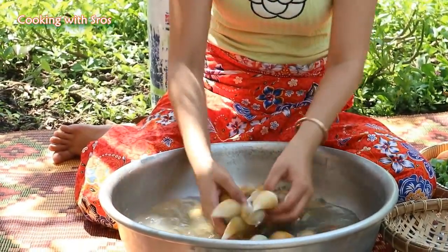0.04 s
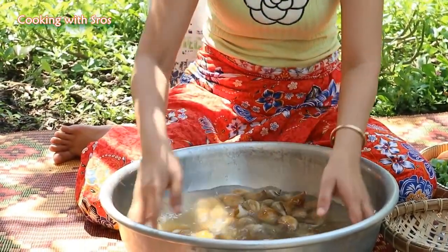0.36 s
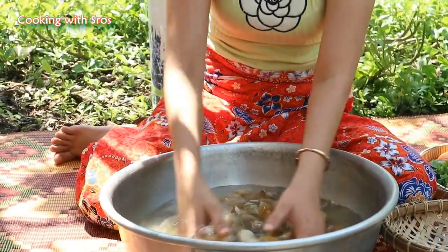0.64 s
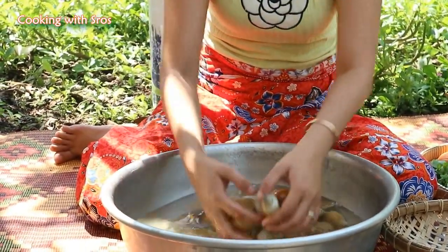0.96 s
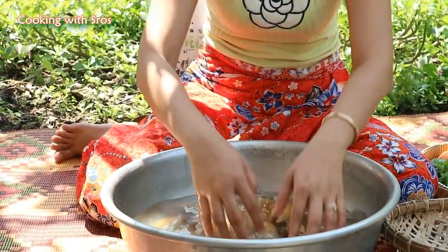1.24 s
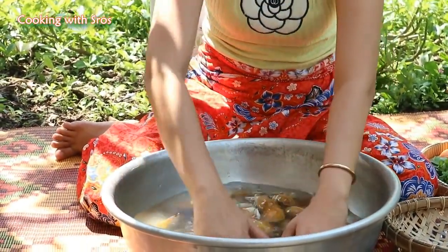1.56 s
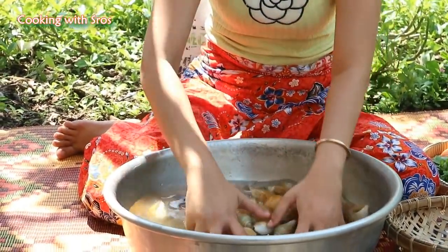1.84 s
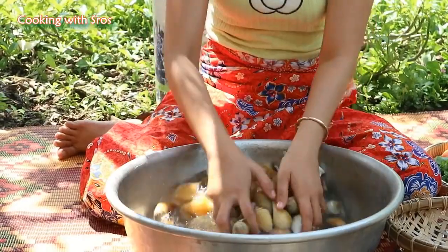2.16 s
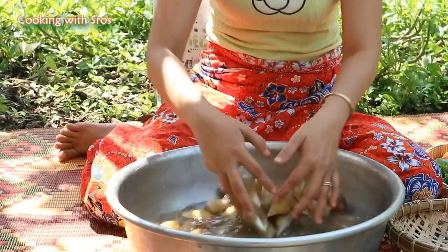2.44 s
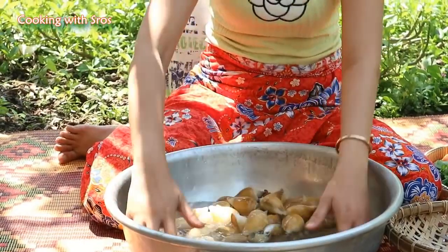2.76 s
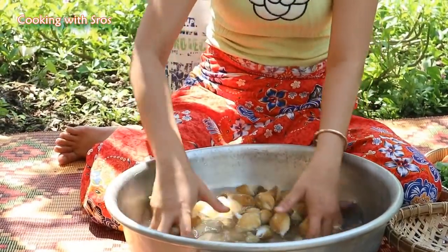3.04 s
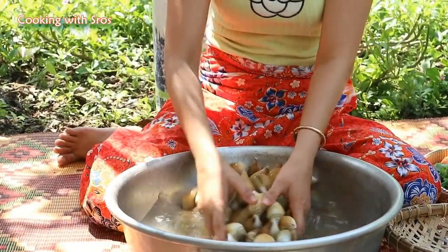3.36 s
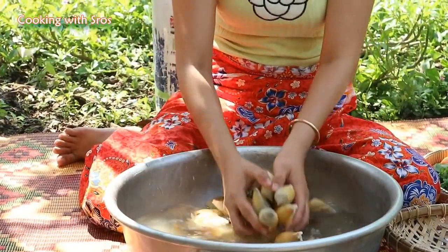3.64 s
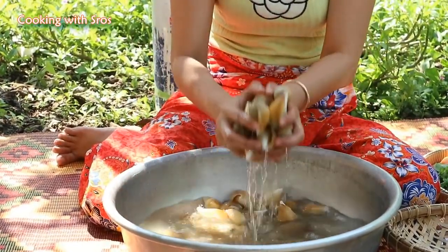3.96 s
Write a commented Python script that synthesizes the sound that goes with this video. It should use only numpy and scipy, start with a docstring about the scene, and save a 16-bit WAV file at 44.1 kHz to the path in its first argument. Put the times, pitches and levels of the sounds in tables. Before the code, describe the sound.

Clams clack and grind as hands wash them in a metal basin with a little water.

```python
"""Hundreds of clams clack and grind as two hands scoop, rub and drop them in a wide metal basin.
Each impact excites a shell's damped modes; heavier ones also ring the water-damped metal.
Single wet shells clink briefly, and a little water sloshes and plops as air pockets resonate.
A faint outdoor rumble and hum lie behind."""
import sys
import numpy as np
from scipy import signal
from scipy.io import wavfile
from scipy.ndimage import uniform_filter1d, minimum_filter1d

SR = 44100
rng = np.random.default_rng(int(sys.argv[2]) if len(sys.argv) > 2 else 0)


def transcribe(signal):
    """Save signal, clipped to [-1, 1], as a 16-bit WAV file at the path in sys.argv[1]."""
    frames = np.atleast_2d(signal).T
    limited = np.clip(frames, -1, 1)
    pcm = np.round(limited * 32767).astype(np.int16)
    wavfile.write(sys.argv[1], SR, pcm)


N = 176400


# Spectrum of the clacks: frequency_hz, gain_db
CLACK_COLOUR = [(300, -29.5), (700, -11.5), (1400, -3), (1850, -0.5), (2650, -2.5), (3000, -6), (3600, 0),
                (4500, -9), (7000, -35)]
def clacks(per_s=400, low_hz=900, high_hz=5600, nominal_t60_s=.033, level_db=-3):
    """Impact excitation: colliding shells of many sizes ring at their natural frequencies."""
    gain = effort()
    shells = [in_basin(shell(hz, nominal_t60_s * rng.uniform(0.39, 1.57)))
              for hz in np.geomspace(low_hz, high_hz, 30)]
    sound = scattered(contacts(per_s, spread_db=1.3) * gain, shells)
    return amp(level_db) * at_level(coloured(sound, CLACK_COLOUR), gain)


def shell(hz, t60_s, overtone_db=-9, ratio=1.942, scatter=0.4):
    """Damped free vibration of a closed shell: a main mode and a weaker inharmonic one."""
    t = np.arange(SR // 10) / SR
    upper_hz = hz * ratio * (1 + scatter * rng.uniform(-0.62, 1))
    overtone = amp(overtone_db - 60 * t / t60_s) * np.sin(2 * np.pi * upper_hz * t)
    return amp(-60 * t / t60_s) * (np.sin(2 * np.pi * hz * t) + overtone)


# Pushes of the hands: start_s, full_s, release_s, touch_db, level_db, rub_db, drag_db
# (touch, rub and drag are relative to level_db)
PUSHES = [(0, 0.042, 0.21, 5.5, -23.5, -2, -3.5), (0.243, 0.61, 0.51, -1, -20.5, -3, -2.5),
          (.63, 0.74, .86, -9, -17.5, -4, -8.5), (0.921, 1.05, 1.027, -0.5, -19.5, -4, -4),
          (1.085, 1.15, 1.246, 1.5, -22, -3.5, -2.5), (1.309, 1.453, 1.419, -7, -19, -3.5, -4.5),
          (1.591, 1.663, 1.756, -16.5, -24, -5, -9), (1.784, 1.95, 1.88, -3.5, -20.5, -3.5, -4),
          (1.906, 1.97, 2.345, -6, -20.5, -2.5, -2.5), (2.375, 2.51, 2.774, 3, -20, -5, -5.5),
          (2.988, 3.02, 3.16, 3, -27, -3.5, -6), (3.087, 3.5, 3.475, -3.5, -17.5, -3, -5),
          (3.503, 3.6, 3.615, 1.5, -22, -2.5, -4.5), (3.636, 4, 3.71, -2.5, -15.5, -6.5, -6),
          (3.727, 3.73, 3.77, 1, -18, -2.5, -3), (3.774, 3.7, 3.885, 0.5, -21, -2.5, -3.5),
          (3.896, 3.97, 4.2, -6, -24.5, -7, 3.5)]
RUB_COLUMN, DRAG_COLUMN = 5, 6
def effort(column=None, power=1, settle_db_per_s=149, rest_db=-41):
    """Driving envelope: each push ramps from touch toward full level and decays from its release."""
    t, gain = np.arange(N) / SR, np.zeros(N)
    for row in PUSHES:
        start_s, full_s, release_s, touch_db, level_db = row[:5]
        ramp_db = np.interp(t, [start_s, max(full_s, start_s + 1 / SR)], [touch_db, 0])
        shape_db = ramp_db - settle_db_per_s * np.maximum(t - release_s, 0)
        offset_db = row[column] if column else 0
        gain = np.maximum(gain, (t >= start_s) * amp(power * shape_db + level_db + offset_db))
    return np.hypot(gain, amp(power * rest_db))


# Spectrum of the rubbing: frequency_hz, gain_db
GRIT_COLOUR = [(400, -25.5), (1500, -3), (2650, 1.5), (2950, -3.5), (3520, 1), (3700, -1), (4000, 0.5),
               (5000, -8), (6500, -14), (10000, -30), (15500, -45)]
def grit(per_s=2200, level_db=0.5):
    """Friction noise: ribbed shells rub, and their edges tick in dense tiny impacts."""
    gain = effort(RUB_COLUMN, power=1.184)
    hits = contacts(per_s, spread_db=2, clump_db=4) * gain
    sound = scattered(hits, [walls() for _ in range(10)])
    return amp(level_db) * at_level(coloured(sound, GRIT_COLOUR), gain)


# Spectrum of a thud on the basin's bottom: frequency_hz, gain_db
THUD_COLOUR = [(40, -36.5), (390, -11.5), (500, 2.5), (700, 0), (820, -7.5), (1020, 4.5), (1140, -13),
               (1350, 1), (4500, -20), (12000, -39)]
def drag(per_s=450, thud_db=-3.5, ring_db=-2.5):
    """Forced vibration: shells bump over the bottom, which thuds and rings."""
    gain = effort(DRAG_COLUMN)
    hits = contacts(per_s, spread_db=3.5) * gain
    thuds = coloured(scattered(hits, [walls() for _ in range(8)]), THUD_COLOUR)
    ring = scattered(hits, [metal() for _ in range(8)])
    return amp(thud_db) * at_level(thuds, gain) + amp(ring_db) * at_level(ring, gain)


# Modes of the wet basin: pitch_hz, level_db, t60_s
BASIN_MODES = [(518, -12, 0.044), (604, -7, 0.1), (764.4, -9.5, 0.34), (891, -5, 0.28), (1030, 2.5, 0.12),
               (1229, -15.5, 0.81), (1790, 0, 0.048), (1870, 8.5, 0.066), (2320, -6.5, 0.15)]
def metal():
    """Modal superposition: each spot on the basin weights its modes differently (mid, side)."""
    t, ring = np.arange(SR // 3) / SR, 0
    for hz, db, t60_s in BASIN_MODES:
        weight = rng.choice([-1, 1], (2, 1)) * rng.uniform(0.91, 1)
        ring += weight * amp(db - 60 * t / t60_s) * np.sin(2 * np.pi * hz * t)
    return unit(ring)


# Spectrum of a hard contact: frequency_hz, gain_db
TICK_COLOUR = [(200, -36), (600, -11), (2000, 4.5), (4000, 1.5), (7000, -14), (15500, -44)]
# Hard landings: start_s, level_db, pitch_hz, relative_crack_db
KNOCKS = [(.309, 3.5, 2010, -5), (.414, 1.5, 1950, -2.5), (.632, -12, 1780, 4), (.732, -7.5, 997, -6),
          (0.891, -3.5, 1740, 3.5), (1.095, -4.5, 1770, 4.5), (1.123, 2, 1900, -13),
          (1.235, -8.5, 1053, -8), (1.256, -7, 920, 3), (1.276, 6, 3300, -7.5), (1.358, -6, 2120, -16),
          (1.825, -6.5, 1030, -2), (1.98, -9, 1900, 3), (2.537, -5, 590, 4.5), (2.557, 1, 1730, -2.5),
          (2.614, -2.5, 1720, -1), (2.66, 1.5, 2390, -4), (2.823, -11.5, 1910, 3), (2.992, -13, 1030, -1.5),
          (3.085, -12, 2320, -14), (3.109, -2, 2360, -9), (3.257, -2.5, 1820, -7), (3.654, -2.5, 1390, 0.5),
          (3.888, 0, 1088, -2), (3.976, -7, 985, 2.5)]
def knocks(crack_s=0.00097, chatter_db=-11, chatter_s=0.014, shell_db=-9, blow_db=-8, ring_db=10.5):
    """A brief impact is broadband: a shell lands with a crack and chatter, and it and the basin ring."""
    out, t = np.zeros((2, N)), np.arange(SR // 5) / SR
    for start_s, db, hz, crack_db in KNOCKS:
        envelope = np.exp(-t / crack_s) + amp(chatter_db) * np.exp(-t / chatter_s)
        crack = amp(crack_db) * rng.standard_normal(len(t)) * envelope
        blow = coloured(crack, TICK_COLOUR) + coloured(crack, THUD_COLOUR)
        add(out, start_s, amp(db + shell_db) * struck(hz))
        add(out, start_s, amp(db + blow_db) * through(blow, walls()))
        add(out, start_s, amp(db + crack_db + ring_db) * metal())
    return out


def struck(hz, ring_cycles=65, touch_s=0.00047, rebound_s=0.002286, rebound_db=-7, muffle_hz=650):
    """Constant-Q decay: a wet shell rings for a set number of cycles and rebounds off a neighbour."""
    t = np.arange(SR // 10) / SR
    onset = 1 - np.exp(-(t / touch_s) ** 2)
    overtone_db = -7 - (hz / muffle_hz) ** 2  # water muffles the overtone of small shells
    ring = onset * shell(hz, ring_cycles / hz, overtone_db)
    neighbour = onset * shell(hz * rng.uniform(0.905, 1.09), ring_cycles / hz / 2, overtone_db)
    rebound = amp(rebound_db) * np.pad(neighbour, (int(rebound_s * SR), 0))[:len(t)]
    return np.outer([1, rng.uniform(-0.52, 1)], ring + rebound)


# Handfuls falling back: start_s, length_s, level_db
TUMBLES = [(1.085, 0.11, -25), (2.132, 0.5, -27), (3.4, 0.54, -26.5)]
def tumbles(per_s=230, low_hz=1740, high_hz=1930, t60_s=0.015):
    """Heavy damping: clams fall on the heap with a hollow clop, all near one pitch."""
    t = np.arange(N) / SR
    gain = sum(amp(db) * ((t > s) & (t < s + length_s)) for s, length_s, db in TUMBLES)
    shells = [in_basin(shell(hz, t60_s, overtone_db=-29)) for hz in np.geomspace(low_hz, high_hz, 5)]
    return at_level(scattered(contacts(per_s, spread_db=1) * gain, shells), gain)


# Single shells colliding: start_s, level_db, pitch_hz
CLINKS = [(0.109, -2, 5000), (.131, 2.5, 1890), (0.173, -4, 1380), (.192, 0, 5040), (0.206, -3, 1420),
          (.208, 2.5, 2840), (0.262, -0.5, 3350), (0.967, -9, 1190), (1.284, 3, 3700), (1.68, -5.5, 1916),
          (1.852, -6, 2660), (2.179, 3, 1950), (2.236, -3, 1990), (2.667, 0, 2450), (3.392, 1, 4100),
          (3.571, 1, 1790), (3.755, 8, 3400), (3.947, -4, 1760)]
def clinks(level_db=-8):
    """Free vibration: single wet shells clink briefly together, without a crack or basin ring."""
    out = np.zeros((2, N))
    for start_s, db, hz in CLINKS:
        add(out, start_s, amp(db + level_db) * struck(hz))
    return out


# Surges of water, peaking half a surge_s before their time: time_s, level_db
SURGES = [(0.048, -31), (.779, -28), (1.421, -31.5), (1.83, -38), (2.112, -39.5), (2.545, -46)]
# Spectrum of the sloshing: frequency_hz, gain_db
WATER_COLOUR = [(40, -29), (140, -5), (210, -0.5), (270, 5), (325, 4.5), (390, -16.5), (560, -3.5),
                (1500, -32)]
def water(per_s=400, low_hz=140, high_hz=850, cycles=4.9, rise=0.094, surge_s=0.033, level_db=-5.5):
    """Bubble resonance: air pockets gulp, rising in pitch, as water laps with the dragging and surges."""
    clock, t = np.arange(N) / SR, np.arange(SR // 6) / SR
    surges = sum(amp(db) * np.exp(-((clock - s + surge_s / 2) / surge_s) ** 2) for s, db in SURGES)
    gain = amp(-9) * effort(DRAG_COLUMN) + surges
    bubbles = []
    for hz in np.geomspace(low_hz, high_hz, 16):
        age = t * hz / cycles
        envelope = (1 - np.exp(-10 * age)) * np.exp(-2 * age)
        bubbles.append(in_basin(envelope * np.sin(2 * np.pi * hz * t * (1 + rise * age))))
    sound = scattered(contacts(per_s, spread_db=5.5) * gain, bubbles)
    return amp(level_db) * at_level(coloured(sound, WATER_COLOUR), gain)


# Large air pockets: start_s, level_db, pitch_hz
PLOPS = [(.493, -19.5, 617), (.612, -25, 537), (3.661, -19.5, 592)]
def plops(swell_s=.003, t60_s=0.17, rise_per_s=2.2):
    """Bubble resonance: a large air pocket closes between the shells with a short rising note."""
    out, t = np.zeros((2, N)), np.arange(SR // 6) / SR
    for start_s, db, hz in PLOPS:
        envelope = (1 - np.exp(-t / swell_s)) * amp(db - 60 * t / t60_s)
        note = np.sin(2 * np.pi * hz * t * (1 + rise_per_s * t / 2))
        add(out, start_s, np.outer([1, 0], envelope * note))
    return out


# Splashes: centre_s, level_db
SPLASHES = [(0.411, -31.5), (1.42, -35), (2.54, -35), (3.451, -30.5), (3.655, -34)]
# Spectrum of the droplets: frequency_hz, gain_db
SPRAY_COLOUR = [(1000, -26), (6000, 4.5), (9000, -6), (15000, -24)]
def spray(per_s=5500, splash_s=0.016, dribble_db=-39.5):
    """Shot noise: fine droplets patter off the moving hands and in brief splashes."""
    t = np.arange(N) / SR
    splashes = sum(amp(db) * np.exp(-((t - s) / splash_s) ** 2) for s, db in SPLASHES)
    gain = amp(dribble_db) * effort() + splashes
    sound = scattered(contacts(per_s, spread_db=-3) * gain, [walls() for _ in range(4)])
    return at_level(coloured(sound, SPRAY_COLOUR), gain)


def walls(early_t60_s=0.032, early_db=1, tail_t60_s=0.3, tail_db=-7):
    """Impulse response of the basin: direct sound, quick reflections and a short tail (mid, side)."""
    t = np.arange(SR // 5) / SR
    early, late = rng.standard_normal((2, 2, len(t))) * (t > .001)
    direct = unit((t == 0) * np.array([[1], [rng.uniform(-1.66, 1)]]))
    reflections = amp(early_db) * unit(early * amp(-60 * t / early_t60_s))
    return direct + reflections + amp(tail_db) * unit(late * amp(-60 * t / tail_t60_s))


# Spectrum of the outdoor noise: frequency_hz, density_db
AIR_COLOUR = [(25, -24), (54, 0.5), (66, -6), (140, -3), (250, -9.5), (3000, -25), (6000, -39),
              (15000, -58)]
# Envelope of that noise: time_s, level_db
RUMBLE = [(1.4, -44.5), (2.2, -37), (2.7, -40), (4, -45.5)]
# Envelope of the distant hum: time_s, level_db
HUM = [(0, -44), (.98, -47.5), (1.12, -69)]
def outdoors(hum_hz=84.3):
    """Ambient noise: low rumble, faint hiss and a distant pure tone that fades."""
    hum = np.sqrt(2) * level(HUM) * np.sin(2 * np.pi * (hum_hz * np.arange(N) / SR + rng.random()))
    return level(RUMBLE) * evened(coloured(rng.standard_normal((2, N)), AIR_COLOUR)) + hum


def contacts(per_s, spread_db, clump_db=3, clump_s=0.011):
    """Poisson process: random impulses of uneven size, louder in small clumps."""
    window = np.hanning(int(2 * clump_s * SR) + 3)
    clumps = evened(signal.oaconvolve(rng.standard_normal(N), window, "same"))
    sizes = amp(spread_db * np.minimum(rng.exponential(1, N), 2.4) + clump_db * np.tanh(clumps))
    return sizes * rng.choice([-1, 1], N) * (rng.random(N) < per_s / SR)


def scattered(hits, responses):
    """Superposition: each impulse excites one of several responses."""
    which = rng.integers(0, len(responses), N)
    return sum(through(hits * (which == k), response) for k, response in enumerate(responses))


def in_basin(sound):
    """Convolution with the basin's reflections, at energy 1."""
    return unit(through(walls(), sound))


def through(x, response):
    """Convolution row by row, keeping the length."""
    return signal.oaconvolve(np.atleast_2d(x), np.atleast_2d(response), axes=1)[:, :x.shape[-1]]


def coloured(x, points, size=4096):
    """Minimum-phase filter through (frequency_hz, gain_db) points."""
    hz, db = np.transpose(points)
    log_hz = np.log(abs(np.fft.fftfreq(size, 1 / SR)) + 1)
    log_gain = np.log(amp(np.interp(log_hz, np.log(hz), db)))
    spectrum = np.exp(np.conj(signal.hilbert(log_gain)))
    return through(x, np.fft.ifft(spectrum).real[:size // 2])


def amp(db):
    """Decibels to amplitude ratio."""
    return 10 ** (np.asarray(db) / 20)


def evened(x):
    """Normalisation to rms 1."""
    return x / np.sqrt(np.mean(x ** 2) + 1e-20)


def unit(x):
    """Normalisation to energy 1."""
    return x / np.sqrt(np.sum(x ** 2) + 1e-20)


def at_level(x, gain):
    """Normalisation to the rms of an envelope."""
    return evened(x) * np.sqrt(np.mean(gain ** 2))


def level(table):
    """Envelope interpolated through (time_s, level_db) points."""
    return amp(np.interp(np.arange(N) / SR, *np.transpose(table)))


def add(mix, start_s, sound):
    """Superposition of a sound on the mix at a time."""
    part = mix[:, max(round(start_s * SR), 0):][:, :sound.shape[1]]
    part += sound[:, :part.shape[1]]


# Stereo width of the microphone: frequency_hz, side_gain_db
WIDTH = [(40, -55), (250, -13), (1000, -30), (2000, -13.5), (4000, -11), (8000, -1.5), (15000, -3)]
# Its balance: frequency_hz, left_minus_right_db
BALANCE = [(400, 0), (980, 3.5), (2330, -0.5), (2800, 0.4)]
def scene():
    """Mid-side stereo: the basin is straight ahead, the bass central and the treble wide."""
    clams = clacks() + tumbles() + grit() + drag() + knocks() + clinks()
    mid, side = clams + water() + plops() + spray() + outdoors()
    side = coloured(side, WIDTH)
    return np.vstack([coloured(mid + sign * side, [(hz, sign * db / 2) for hz, db in BALANCE])
                      for sign in (1, -1)])


def record(dry, ceiling=.86, cutoff_hz=15600):
    """Peak limiting holds down the highest peaks; a low-pass filter then limits the band."""
    needed_gain = ceiling / np.maximum(abs(dry).max(0), ceiling)
    limited = dry * uniform_filter1d(minimum_filter1d(needed_gain, size=65), size=65)
    lowpass = signal.firwin(511, cutoff_hz, window=("kaiser", 9), fs=SR)
    return signal.oaconvolve(limited, lowpass[None], "same")


dry = scene()
out = record(dry)
transcribe(out)
```